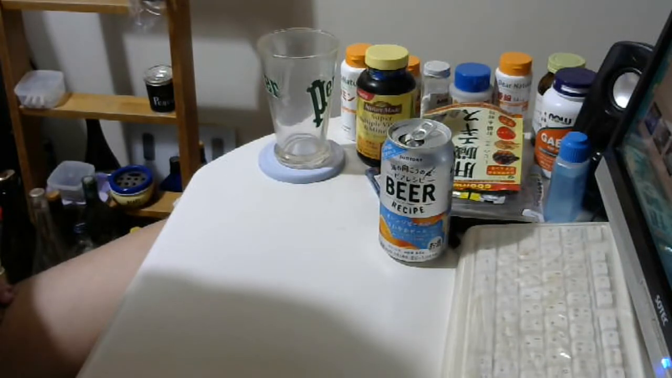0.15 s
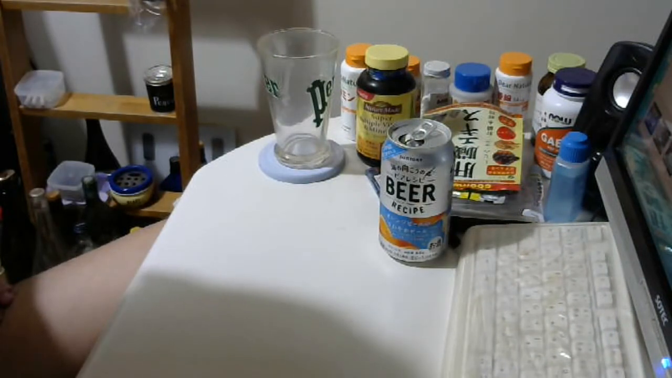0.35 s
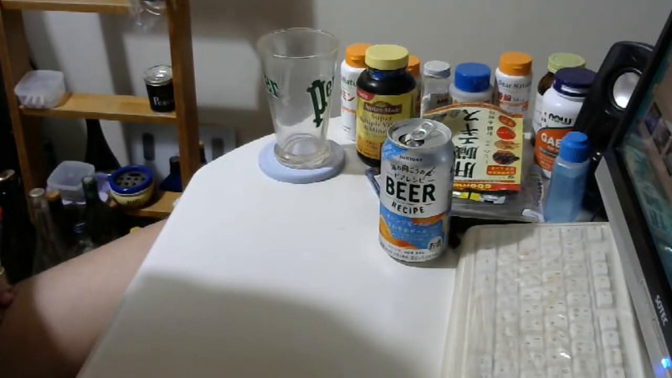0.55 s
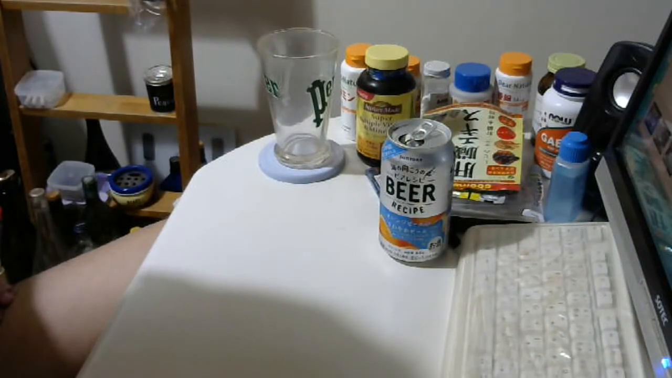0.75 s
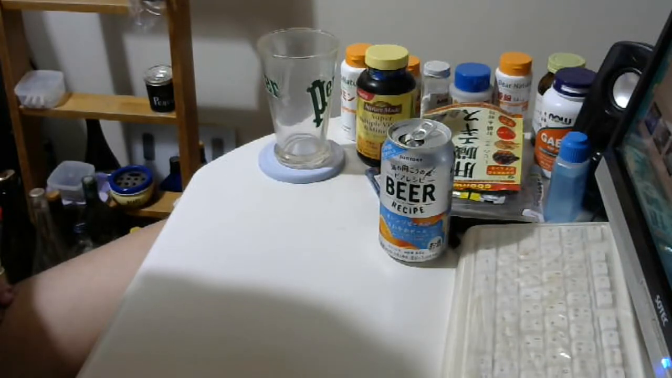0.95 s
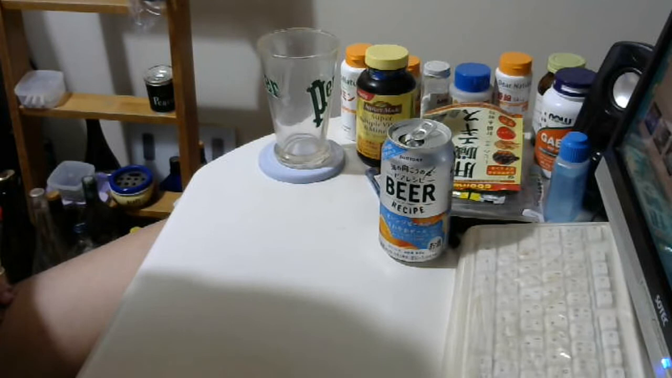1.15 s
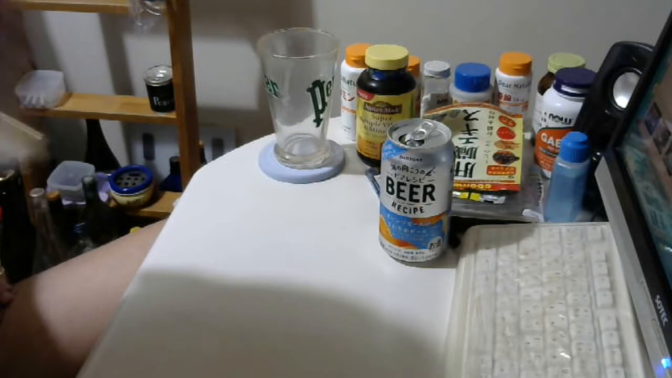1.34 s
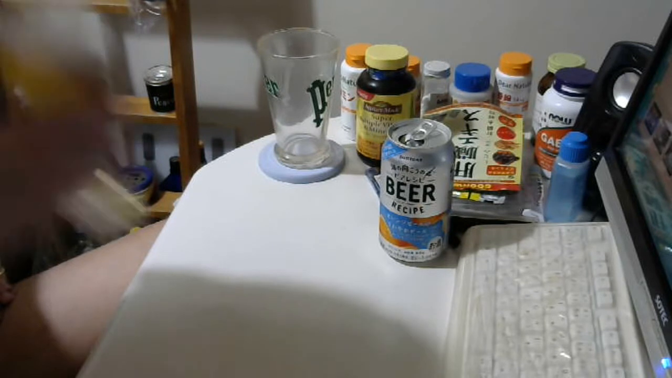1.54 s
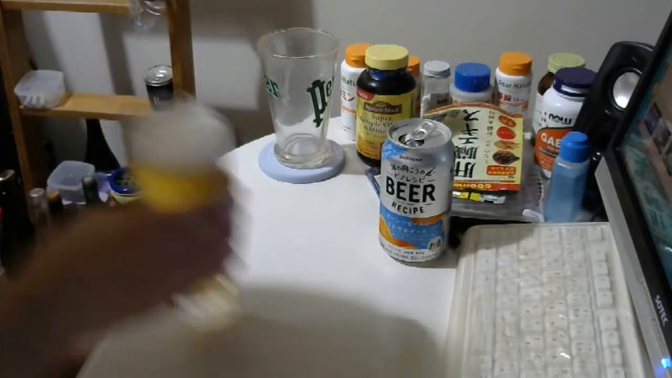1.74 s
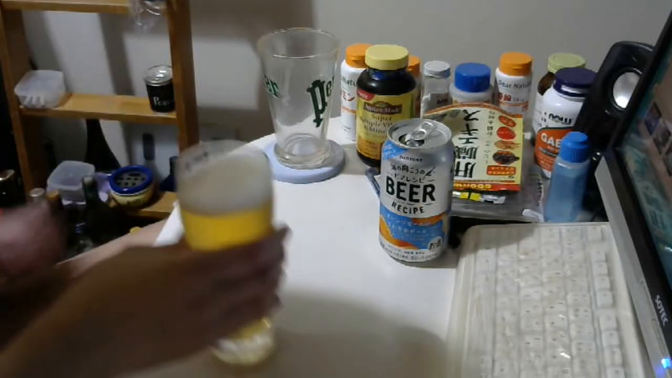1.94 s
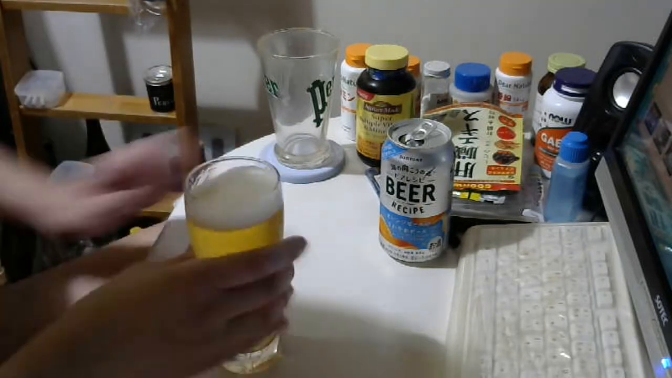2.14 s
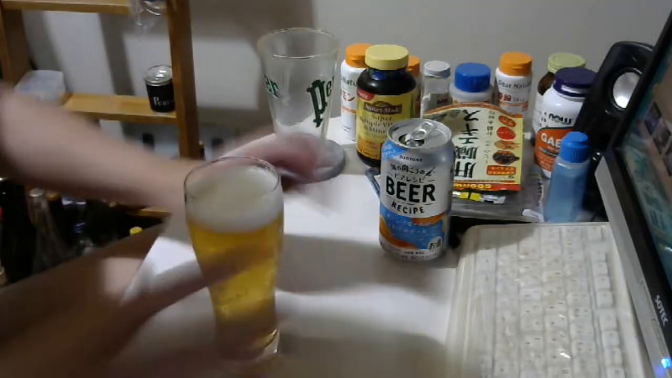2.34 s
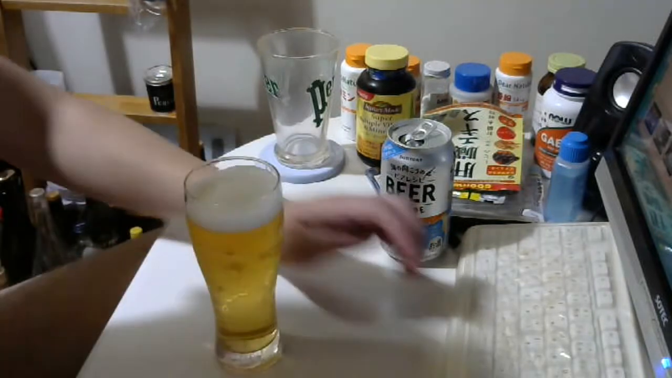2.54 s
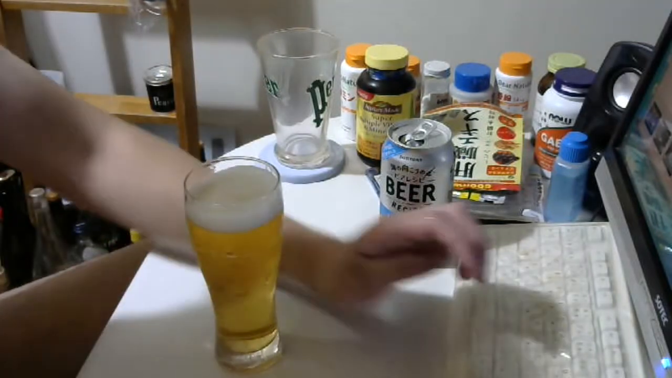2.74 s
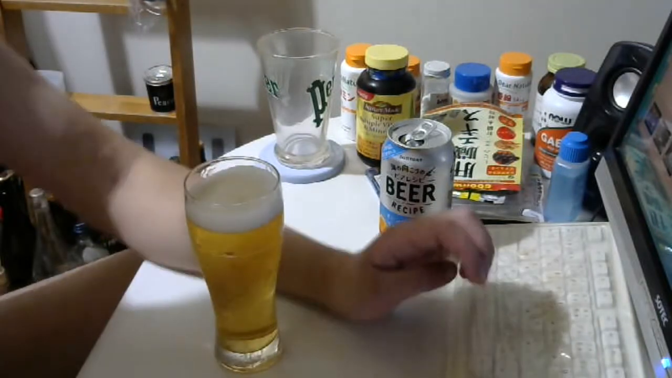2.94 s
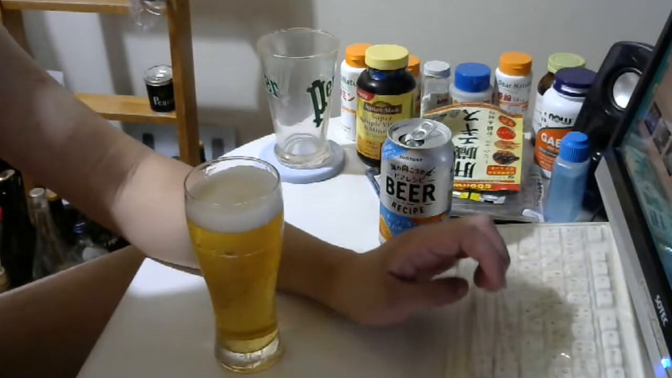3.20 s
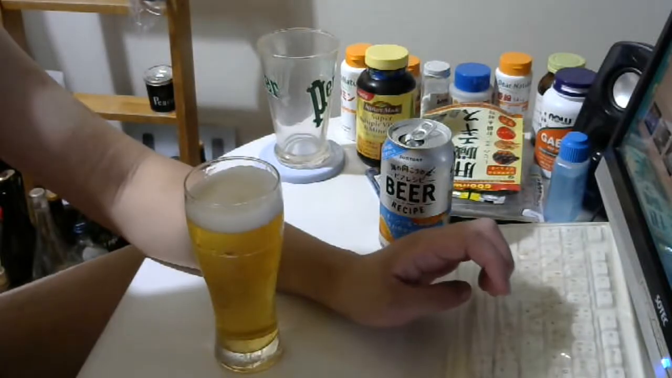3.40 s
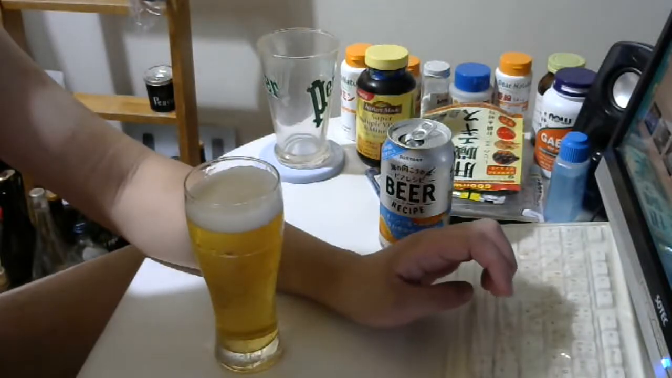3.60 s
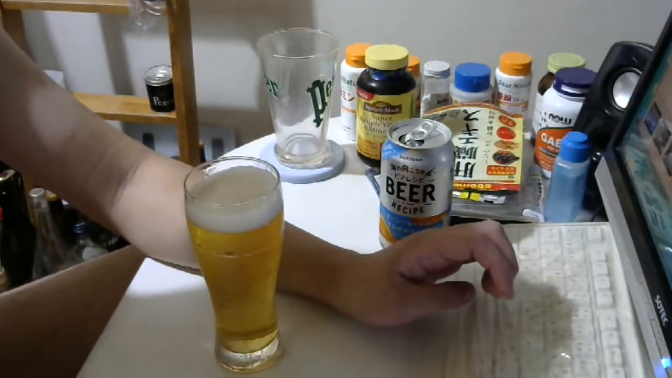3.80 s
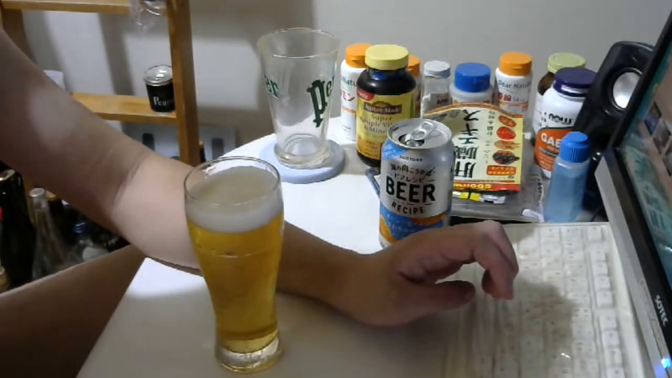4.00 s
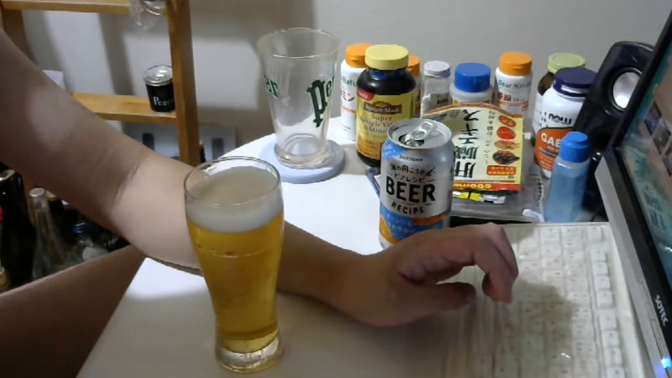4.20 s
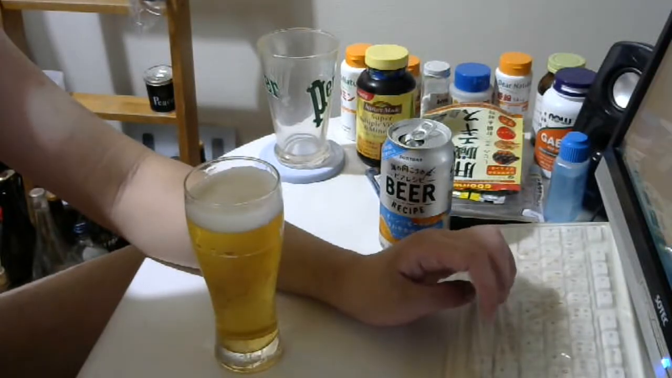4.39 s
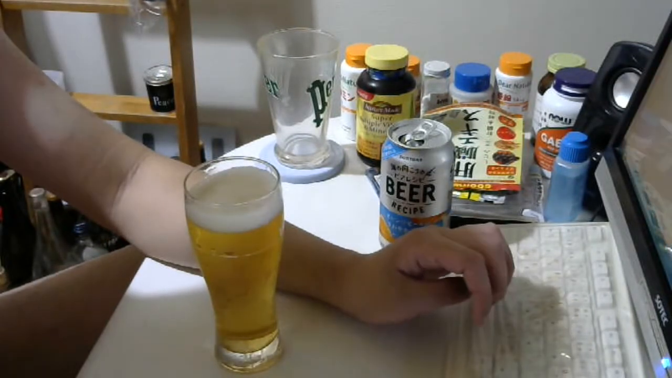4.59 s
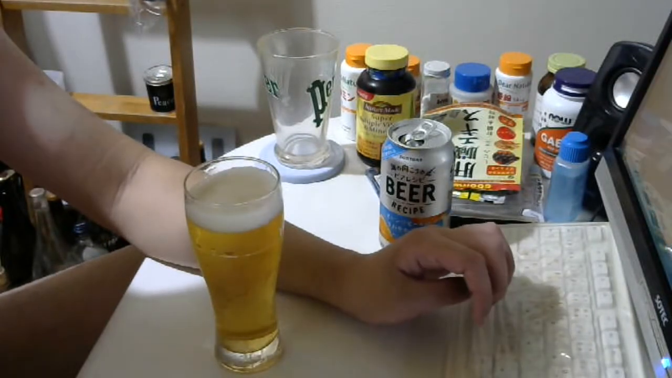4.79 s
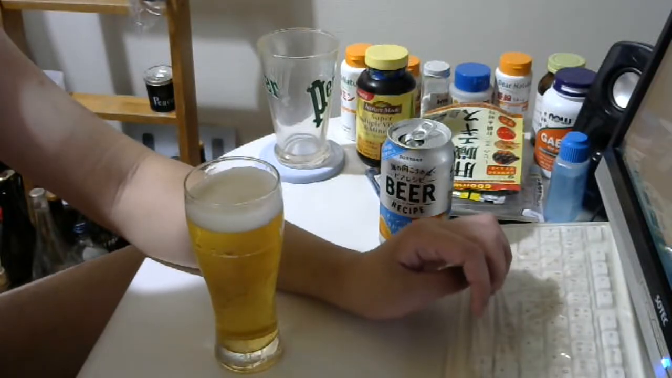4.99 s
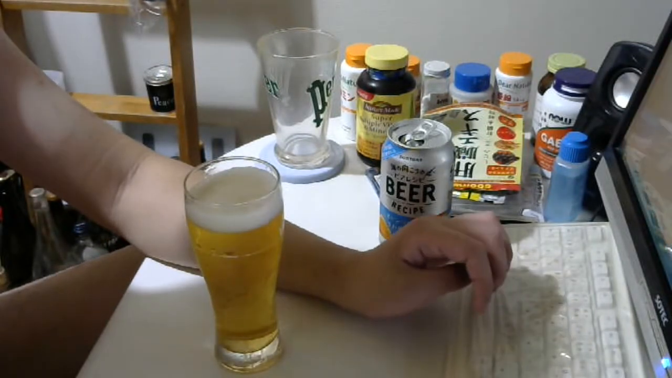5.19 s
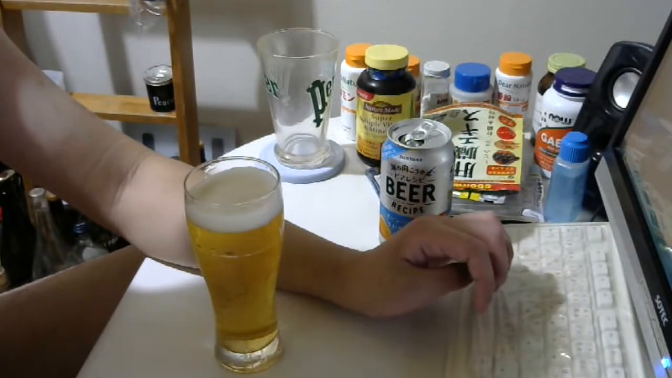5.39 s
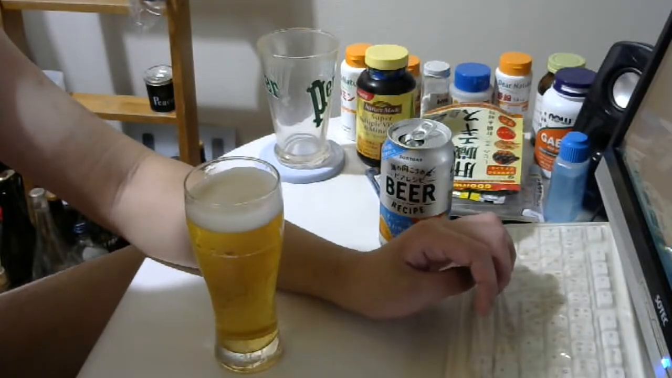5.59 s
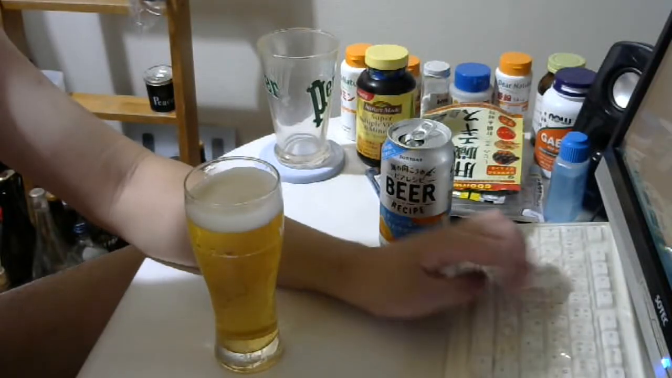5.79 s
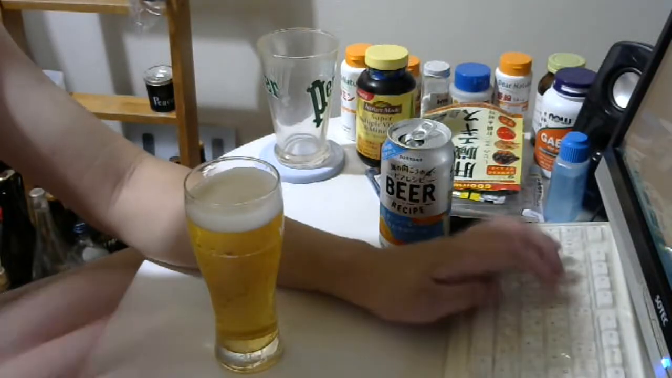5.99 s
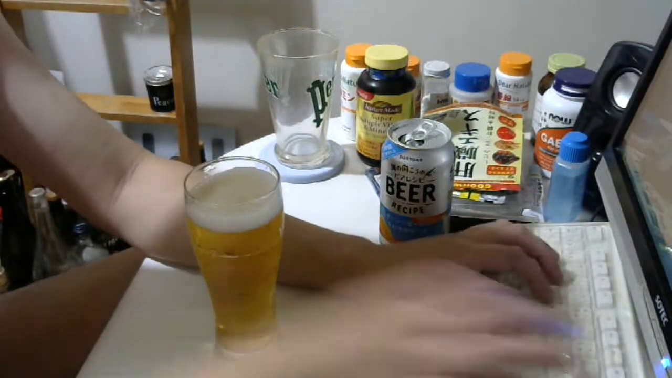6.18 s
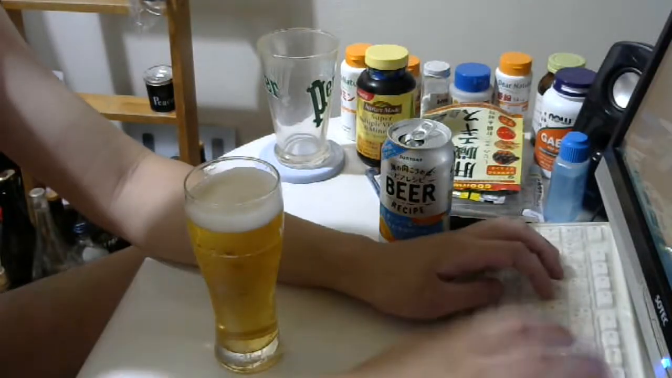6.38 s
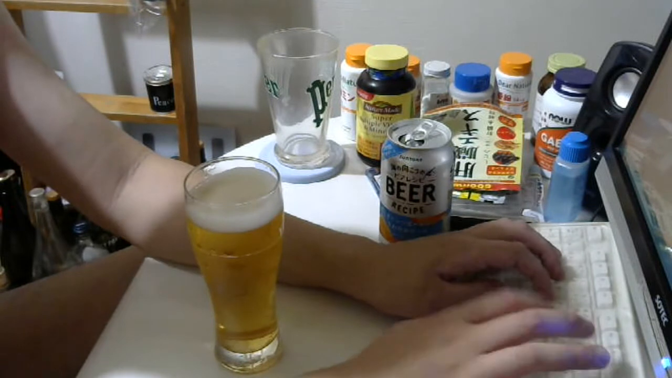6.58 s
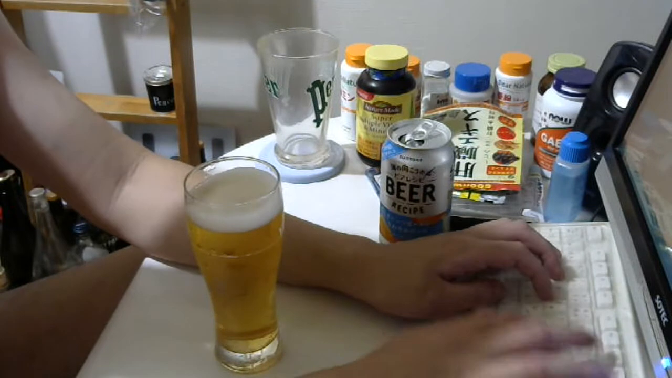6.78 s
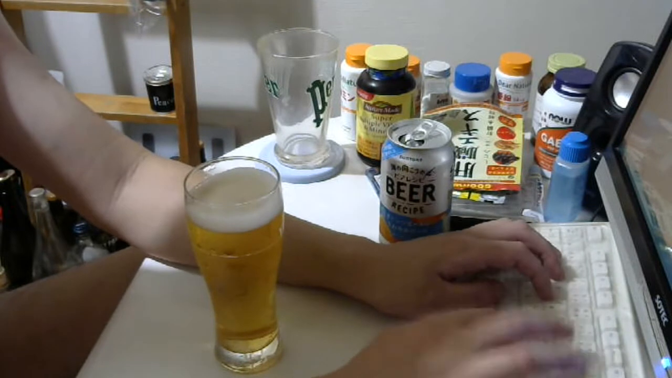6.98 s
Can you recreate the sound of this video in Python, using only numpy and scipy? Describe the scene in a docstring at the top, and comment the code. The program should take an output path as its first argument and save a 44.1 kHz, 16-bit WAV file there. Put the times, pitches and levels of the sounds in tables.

```python
"""From the start an appliance throbs softly and a fan hums, as low swells, coloured noise and sines.
Mouse ticks follow; near 2 s a full beer glass lands hard on a desk and excites the desk's damped modes.
Hands then bump the desk, fingers brush the keys as noise bursts, and the mouse button clicks twice.
More ticks and brushed keys lead to one key pressed right down near 7 s.
The room is small and quiet, the webcam close; filtered echoes supply its reflections."""
import sys
import numpy as np
from scipy import signal
from scipy.fft import rfft, irfft, next_fast_len
from scipy.io import wavfile
from scipy.ndimage import map_coordinates

SR = 44100
rng = np.random.default_rng(int(sys.argv[2]) if len(sys.argv) > 2 else 0)


def master_out(mix):
    """Clip the mix to full scale and print it as 16-bit PCM to the path in sys.argv[1]."""
    frames = np.transpose(np.atleast_2d(mix))
    ceiling = np.clip(frames, -1, 1)
    pcm = np.round(ceiling * 32767).astype(np.int16)
    wavfile.write(sys.argv[1], SR, pcm)


N = 310464  # length [samples]

# Reverberation of the room: (frequency [Hz], decay time T60 [s])
ROOM_T60 = [(100, 0.93), (250, 0.23), (500, 0.29), (1000, 0.2), (2500, 0.18), (6500, 0.17), (11000, 0.125)]
TOP_HZ = 15700  # upper band limit of the webcam

# Appliance motor
STROKE_HZ, FIRST_STROKE_S = 21.41, 0.036

# Spectrum of the fan's air noise and hiss: (frequency [Hz], relative density [dB per Hz])
AIR_SPECTRUM = [(30, -36.5), (160, -22), (280, -13), (350, -7), (450, -4.5), (560, -7), (750, -11),
                (980, -11.5), (1240, -12.5), (2400, -17), (4750, -24), (6500, -21.5), (7800, -31),
                (9490, -38.5), (12300, -39)]
# Spectrum of the low rumble: (frequency [Hz], relative density [dB per Hz])
RUMBLE_SPECTRUM = [(20, -36.5), (32, -18.5), (52, -18), (85, -0.5), (125, -3), (175, 4), (240, 0),
                   (290, -5.5), (400, -34.5), (700, -40.5), (3000, -50), (12000, -70.5)]
# Mains and motor lines: (frequency [Hz], rms level [dB])
HUM_LINES = [(100, -84.5), (121.5, -81), (400, -98), (414, -91), (650, -91), (700, -92.5)]
# Blade tone of the fan: (time [s], rms level [dB])
BLADE_LEVEL = [(0, -82.5), (2.5, -79), (3.5, -78.5), (4.1, -86.5), (4.55, -90), (4.8, -78.5), (5.3, -77.5),
               (5.8, -88), (7.04, -99)]
RUMBLE_START_DB, RUMBLE_RISE_DB_PER_S = -72, 0.43  # the rumble creeps up

# Soft bumps of the hands on the desk: (time [s], peak level [dB], frequency [Hz], T60 [s])
HAND_BUMPS = [(2.411, -66, 71.7, 0.15), (2.866, -54.5, 98, 0.088), (4.772, -56, 480, 0.06),
              (6.36, -70, 74.5, 0.1), (6.78, -59, 472, 0.066)]

# Fingertips brushing key tops: (time [s], relative level [dB], strongest ring [Hz], its lift [dB])
KEY_BRUSHES = [(3.074, -56.5, 826, 37), (3.146, -65, 1430, 9), (3.239, -65, 4110, 14),
               (6.42, -47.5, 1530, 12.5), (6.5, -61.5, 1750, 10), (6.739, -49, 2800, 11),
               (6.818, -63, 3320, 21)]
# A key pressed right down: (time [s], relative level [dB], strongest ring [Hz], its lift [dB])
KEY_PRESS = [(7.0055, -30, 2780, 2.5)]
# Colour of a brushed key top: (frequency [Hz], relative density [dB per Hz])
KEYTOP_SPECTRUM = [(200, 4), (700, -8), (1400, -7.5), (2100, -2), (2700, -3), (3900, -14.5), (4900, -6),
                   (6600, -5.5), (8000, -20), (10000, -29), (12000, -63)]
# Colour of a pressed keycap and the keyboard case: (frequency [Hz], relative density [dB per Hz])
KEYCAP_SPECTRUM = [(200, -32.5), (650, -31), (900, 0), (1400, 0), (1800, -27), (2300, -3.5), (2950, 7),
                   (3300, -13), (3850, -8.5), (4500, -16), (5500, -7), (6500, -9.5), (7700, -21),
                   (12500, -49)]
BRUSH_S, PRESS_S = 0.00696, 0.0014  # time a fingertip takes to seat a keycap
# Every brush also thumps the desk through the keyboard; the level is relative to the brush
THUMP_DB, THUMP_HZ, THUMP_T60_S = -7.5, 183, 0.11

# Colour of the mouse shell: (frequency [Hz], relative density [dB per Hz])
SHELL_SPECTRUM = [(200, -43), (850, -6.5), (1500, -22.5), (2600, -16), (4200, -12.5), (4900, 3.5),
                  (7200, 4.5), (8200, -6), (9100, -23.5), (9900, -18.5), (11000, -36), (13000, -45)]
# Clearest modes of the mouse shell: (frequency [Hz], relative level [dB], T60 [s])
SHELL_MODES = [(4770, 9.5, 0.051), (6050, 1, 0.056), (6400, -9, 0.12), (7800, -14, .11)]
# Button presses: (time [s], time held [s], relative level [dB], ring of the release [Hz])
BUTTON_CLICKS = [(3.9546, 0.0757, -31.5, 5250), (5.5918, 0.0854, -32.5, 7160)]
# Light ticks of the mouse being handled: (time [s], relative level [dB], strongest ring [Hz])
MOUSE_TICKS = [(0.954, -66, 6100), (1.0715, -46, 6300), (1.3396, -46, 6370), (2.308, -62, 7460),
               (2.928, -63, 7000), (2.939, -54.5, 8900), (3.0, -66.5, 6100), (6.2266, -40.5, 6100),
               (6.2425, -40, 8760), (6.254, -55, 6800), (6.2676, -46.5, 6750), (6.832, -63, 7240)]
# The press is thin and bright, the release fuller and more rattly
PRESS_HZ, PRESS_LIFT_DB, PRESS_RATTLE_DB = 8500, 12.5, -4.5
RELEASE_DB, RELEASE_LIFT_DB, RELEASE_RATTLE_DB = 2, 2.5, 1.5  # RELEASE_DB is relative to the press
# The lighter a tick, the more of it is loose rattle: LOOSENESS is in dB per dB below FIRM_DB
TICK_LIFT_DB, FIRM_DB, TICK_RATTLE_DB, LOOSENESS = 14, -41, 4, 0.19

# Contacts as the glass lands and its base settles: (time [s], relative level [dB])
GLASS_CONTACTS = [(2.0481, 1), (2.0574, -21.5), (2.0708, -12.5)]
# Modes of the desk with the glass on it: (frequency [Hz], relative level [dB], T60 [s])
DESK_MODES = [(81, -15, 0.45), (127, -15, 0.39), (170, -8, .3), (168.6, -29, 0.25), (194.4, -5.5, 0.44),
              (205.2, -25.5, 0.17), (263.7, -3, 0.33), (292.8, -13, 0.38), (353, -4.5, 0.33),
              (385, -12, 0.38), (415.4, -11, 0.22), (449, 3.5, 0.15), (458, -5.5, 0.34), (543, -2, 0.2),
              (583, -2.5, 0.22), (651, -5, .25), (662, -10, .25), (703, -7.5, 0.2109), (756, -9.5, 0.27),
              (953, -3, .15), (1071, -17.5, .18), (1187, -11.5, 0.1), (1295, -17, 0.15), (1427, -22, .17),
              (1665, -11, 0.13), (1949, -21.5, .15), (2070, -12.5, 0.13), (2233, -20, 0.13)]
# Colour of the blow: (frequency [Hz], relative density [dB per Hz])
BLOW_SPECTRUM = [(30, -47), (90, -7), (185, 10), (290, -9.5), (470, 4), (720, -3.5), (900, -9),
                 (2000, -18.5), (3000, -25.5), (4000, -24), (5000, -29.5), (6500, -26), (8000, -39.5),
                 (10000, -61.5), (12500, -92)]
# Colour of the desk's diffuse ring: (frequency [Hz], relative density [dB per Hz])
RING_SPECTRUM = [(100, -61.5), (150, -10.5), (220, -2.5), (310, -8), (500, -2), (1000, -3), (2100, -14.5),
                 (2900, -23), (4000, -23.5), (5200, -25.5), (6800, -26), (8300, -39.5), (10000, -44),
                 (12500, -76.5)]


def amp(db):
    """Level principle: a gain is ten to the power of decibels over twenty."""
    return 10 ** (np.asarray(db) / 20)


def unit(x):
    """Root-mean-square principle: scale to rms 1."""
    return x / np.sqrt(np.mean(x ** 2) + 1e-20)


def along(points, hz):
    """Logarithmic pitch: interpolate (Hz, value) points on a log-frequency axis."""
    f, value = np.transpose(points)
    return np.interp(np.log(hz + 1), np.log(f + 1), value)


def wobble(rate):
    """Slow random fluctuation: a smooth curve through `rate` random knots a second."""
    knots = rng.standard_normal(int(N * rate / SR) + 4)
    return map_coordinates(knots, [np.arange(N) * rate / SR])


def add(track, s, sound):
    """Superposition: sum a sound into the track at time s [s]."""
    part = track[round(s * SR):][:len(sound)]
    part += sound[:len(part)]


def noise(spectrum, size=N):
    """Spectral shaping: white noise weighted in frequency, with rms 1."""
    white = rfft(rng.standard_normal(size))
    gain = amp(along(spectrum, np.fft.rfftfreq(size, 1 / SR)))
    return unit(irfft(white * gain, size))


def body(spectrum, ring_hz=1000, lift_db=0, octaves=0.1, size=4096):
    """Minimum phase: a causal impulse response of peak 1 with this colour and one lifted resonance."""
    hz = np.fft.rfftfreq(size, 1 / SR)
    lift = lift_db * np.exp(-.5 * (np.log2((hz + 1) / ring_hz) / octaves) ** 2)
    cepstrum = irfft(np.log(amp(along(spectrum, hz) + lift)))
    # folding the cepstrum onto positive time makes the response causal
    cepstrum[1:size // 2] *= 2
    cepstrum[size // 2 + 1:] = 0
    response = irfft(np.exp(rfft(cepstrum)))
    return response / np.abs(response).max()


def fade(x, stretch=1, bend=1.66):
    """Frequency-dependent absorption: each band dies at its own pace, slowly at first, then ever faster."""
    hz, t, z = signal.stft(x, SR, nperseg=256)
    age = t / (stretch * along(ROOM_T60, hz)[:, None])  # 1 where the band is 60 dB down
    decayed = z * amp(-60 * age ** bend)
    return signal.istft(decayed, SR, nperseg=256)[1][:len(x)]


def scatter(near_db, near_t60, room_db, stretch):
    """Reflection: the direct path, quick echoes from the desk's clutter, then the room."""
    t = np.arange(SR // 2) / SR
    direct = t == 0
    near = rng.standard_normal(len(t)) * amp(-60 * t / near_t60)
    tail = fade(rng.standard_normal(len(t)), stretch)
    echoes = amp(near_db) * near / np.linalg.norm(near) + amp(room_db) * tail / np.linalg.norm(tail)
    # small objects reflect only short waves
    short_waves = signal.butter(2, 700, "high", fs=SR, output="sos")
    return direct + signal.sosfilt(short_waves, echoes)


def throb(level_db=-58.0, pitch_hz=182, width_s=0.0076, uneven_db=2.0, jitter_s=0.00022, pitch_spread=0.031):
    """Periodic forcing: a motor, perhaps a fridge compressor, gives a low swell of uneven strength per stroke."""
    out, t = np.zeros(N), np.arange(-SR // 40, SR // 40) / SR
    strokes = np.arange(FIRST_STROKE_S, N / SR, 1 / STROKE_HZ)
    variations = rng.standard_normal((len(strokes), 3))
    for s, (late, strength, tight) in zip(strokes, variations):
        hz = pitch_hz * (1 + pitch_spread * tight)
        swell = np.exp(-.5 * (t / width_s) ** 2) * np.sin(2 * np.pi * hz * t)
        add(out, s + t[0] + jitter_s * late, amp(level_db + uneven_db * strength) * swell)
    return out


def fan(air_db=-73.5, blade_hz=489, hum_db=0):
    """Broadband and tonal flow noise: air, rumble, motor lines and a blade tone that swells and sinks."""
    t = np.arange(N) / SR
    lines = sum(amp(db) * np.sin(2 * np.pi * hz * t + .3 * wobble(2)) for hz, db in HUM_LINES)
    phase_drift = .9 * wobble(3)
    blade_gain = amp(np.interp(t, *np.transpose(BLADE_LEVEL)))
    blade = blade_gain * np.sin(2 * np.pi * blade_hz * t + phase_drift)
    unrest_db = 2.5 * wobble(9)
    rumble_db = RUMBLE_START_DB + RUMBLE_RISE_DB_PER_S * t + unrest_db
    rumble = amp(rumble_db) * noise(RUMBLE_SPECTRUM)
    tones = np.sqrt(2) * (amp(hum_db) * lines + blade)  # rms to peak
    return amp(air_db) * noise(AIR_SPECTRUM) + rumble + tones


def bumps(rise_s=0.00077):
    """Soft impact: flesh on the desk, or a key as it seats, wakes only one quickly damped mode."""
    out, t = np.zeros(N), np.arange(SR // 3) / SR
    thumps = [(s + 2 * BRUSH_S, db + THUMP_DB, THUMP_HZ, THUMP_T60_S) for s, db, *_ in KEY_BRUSHES]
    for s, db, hz, t60 in list(HAND_BUMPS) + thumps:
        thud = np.sin(2 * np.pi * hz * t) * amp(-60 * t / t60) * (1 - np.exp(-t / rise_s))
        add(out, s, amp(db) * thud / np.abs(thud).max())
    return out


def keys(rows, colour, contact_s, room_db, level_db):
    """Chattering contact: a loose keycap rattles in step with the time a fingertip takes to seat it."""
    out, t = np.zeros(N), np.arange(SR // 10) / SR
    for s, db, ring_hz, lift_db in rows:
        chatter = rng.standard_normal(len(t)) * t / contact_s * np.exp(-t / contact_s)
        clack = signal.fftconvolve(chatter, body(colour, ring_hz, lift_db, octaves=0.41))
        path = scatter(near_db=-1.0, near_t60=0.011, room_db=room_db, stretch=0.7)
        heard = signal.fftconvolve(clack, path)
        add(out, s, amp(db + level_db) * heard / np.linalg.norm(heard))
    return out


def snap(ring_hz, lift_db, rattle_db, modes_db=-48):
    """Impulsive excitation: one sharp contact cracks on the mouse's thin shell and rings it briefly."""
    t = np.arange(SR // 2) / SR
    ring = np.zeros(len(t))
    for hz, level, t60 in SHELL_MODES:
        mode_hz = hz * rng.normal(1, 0.0019)  # slightly different at each snap
        ring += amp(level - 60 * t / t60) * np.sin(2 * np.pi * mode_hz * t)
    path = scatter(near_db=rattle_db, near_t60=0.033, room_db=rattle_db - 6.0, stretch=0.58)
    return signal.fftconvolve(body(SHELL_SPECTRUM, ring_hz, lift_db), path + amp(modes_db) * ring)


def mouse():
    """Snap-through: the switch spring snaps twice per click; the handled shell also ticks."""
    out = np.zeros(N)
    for s, held, db, release_hz in BUTTON_CLICKS:
        add(out, s, amp(db) * snap(PRESS_HZ, PRESS_LIFT_DB, PRESS_RATTLE_DB))
        release = snap(release_hz, RELEASE_LIFT_DB, RELEASE_RATTLE_DB)
        add(out, s + held, amp(db + RELEASE_DB) * release)
    for s, db, ring_hz in MOUSE_TICKS:
        rattle_db = TICK_RATTLE_DB + LOOSENESS * (FIRM_DB - db)
        add(out, s, amp(db) * snap(ring_hz, TICK_LIFT_DB, rattle_db))
    return out


def glass(blow_db=-10, modes_db=-23.0, ring_db=-29.5, build_s=.002, damped_s=0.23):
    """Modal excitation: the hard base cracks on the desk top, whose modes ring on into the room."""
    out, t = np.zeros(N), np.arange(SR * 3 // 4) / SR
    for s, db in GLASS_CONTACTS:
        path = scatter(near_db=3.0, near_t60=0.064, room_db=-5.0, stretch=.85)
        add(out, s, -amp(db + blow_db) * signal.fftconvolve(body(BLOW_SPECTRUM), path))
    # the blow pushes every mode down at once
    modes = -sum(amp(db - 60 * t / t60) * np.sin(2 * np.pi * hz * t) for hz, db, t60 in DESK_MODES)
    diffuse = fade(noise(RING_SPECTRUM, size=len(t)), stretch=1.0)
    # bending waves need a moment to fill the board
    build_up = 1 - np.exp(-t / build_s)
    landing_s = GLASS_CONTACTS[0][0]
    add(out, landing_s, (amp(modes_db) * modes + amp(ring_db) * diffuse) * build_up)
    # the last of the ring is choked off
    age = np.maximum(np.arange(N) / SR - landing_s, 0)
    choke = np.exp(-(age / damped_s) ** 10)
    # a low cut near 68 Hz keeps the knock free of deep rumble
    low_cut = signal.butter(4, 68, "high", fs=SR, output="sos")
    return signal.sosfilt(low_cut, out * choke)


def scene():
    """Superposition: all sources add at one microphone on the desk."""
    brushed = keys(KEY_BRUSHES, KEYTOP_SPECTRUM, BRUSH_S, room_db=-20.0, level_db=21.5)
    pressed = keys(KEY_PRESS, KEYCAP_SPECTRUM, PRESS_S, room_db=-4.0, level_db=16.0)
    return (throb() + fan() + bumps() + brushed + pressed + mouse() + glass())[None]


def record(dry):
    """Band limitation: the webcam keeps nothing at or above its upper limit."""
    size = next_fast_len(N + SR // 2)
    passband = np.fft.rfftfreq(size, 1 / SR) < TOP_HZ
    return irfft(rfft(dry, size) * passband, size)[:, :N]


dry = scene()
out = record(dry)
master_out(out)
```